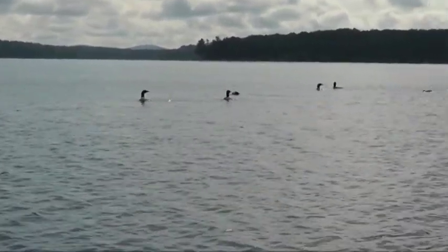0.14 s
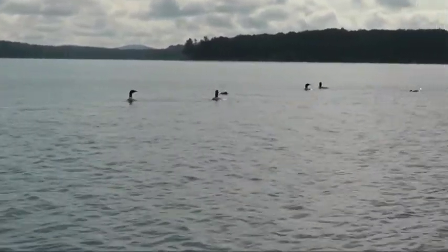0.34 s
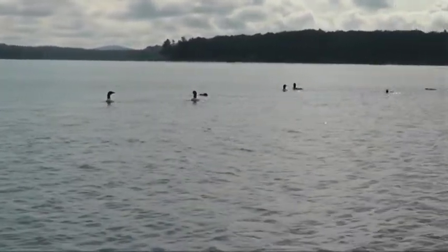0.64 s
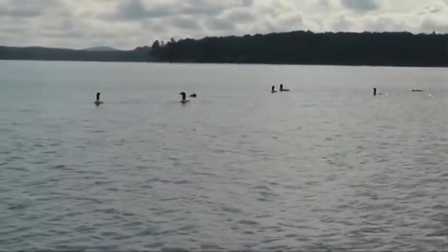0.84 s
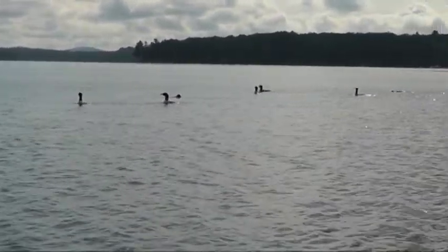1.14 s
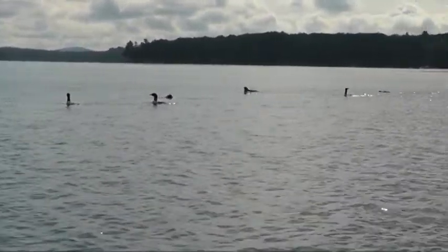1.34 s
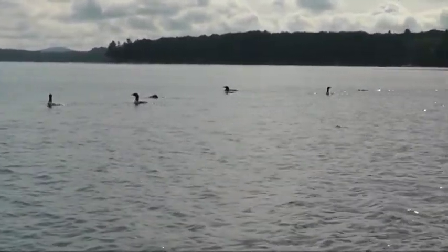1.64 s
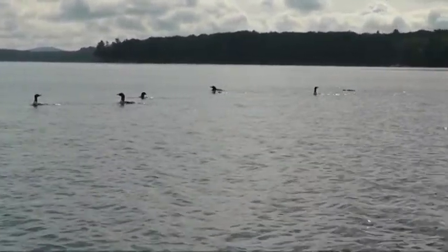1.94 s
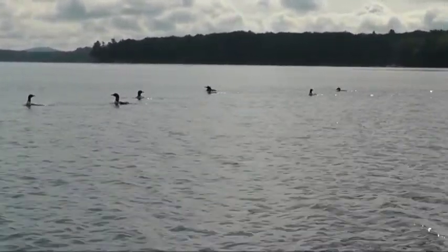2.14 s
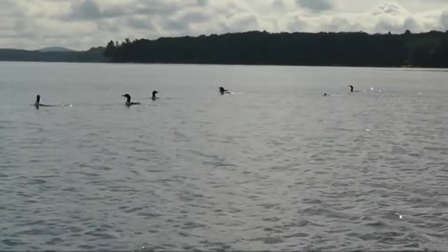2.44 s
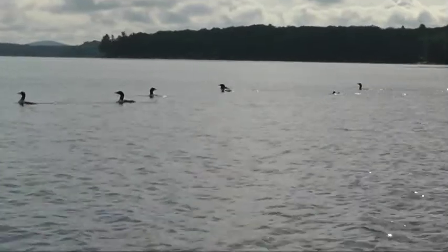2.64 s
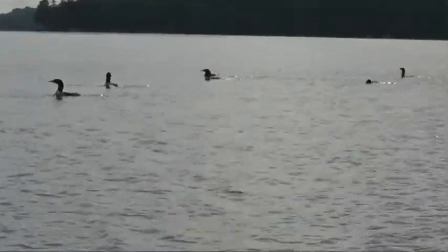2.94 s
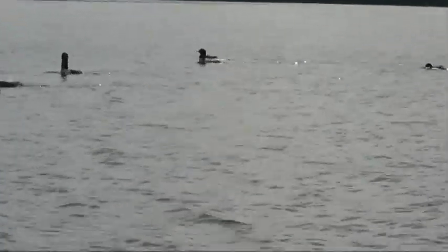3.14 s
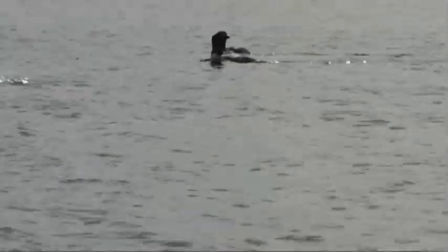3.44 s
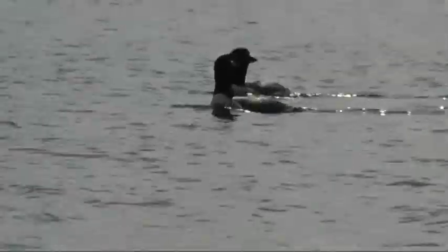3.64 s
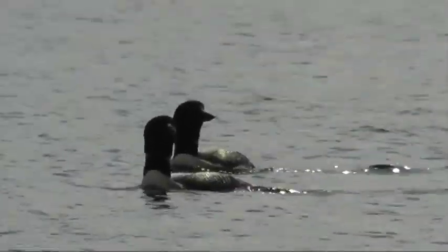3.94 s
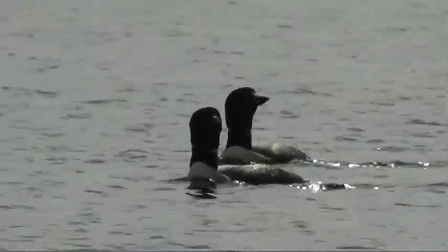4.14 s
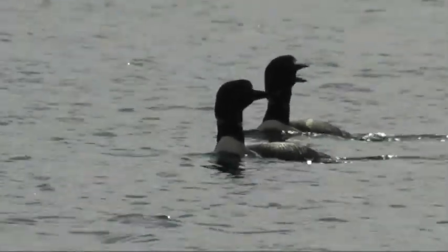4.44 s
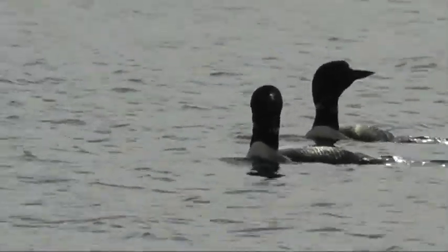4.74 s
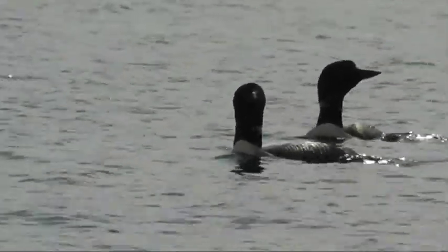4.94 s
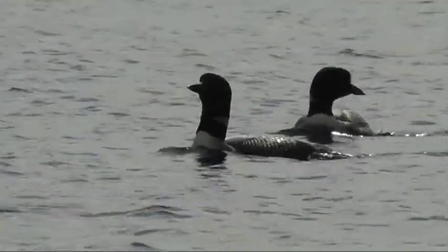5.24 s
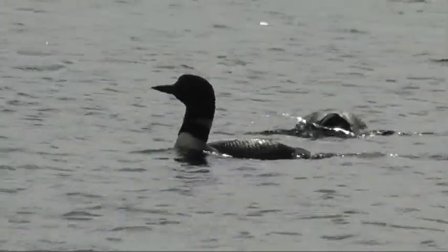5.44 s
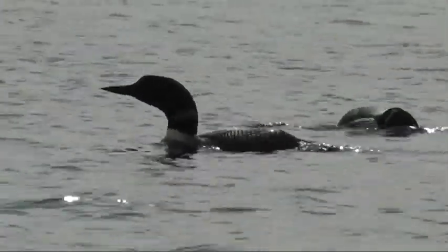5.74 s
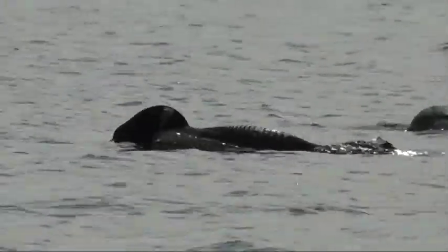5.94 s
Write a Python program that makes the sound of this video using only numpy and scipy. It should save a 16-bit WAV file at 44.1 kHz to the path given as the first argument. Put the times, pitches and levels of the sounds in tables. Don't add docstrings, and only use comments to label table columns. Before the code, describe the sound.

Several loons trade quavering, yodel-like laughing calls across an open lake, overlapping toward the end, over light wind buffeting and rippling water hiss.

```python
import sys
import numpy as np
from scipy import signal
from scipy.io import wavfile
from scipy.ndimage import uniform_filter1d

SR = 44100
rng = np.random.default_rng(int(sys.argv[2]) if len(sys.argv) > 2 else 0)


def persist_wave(psi):
    counts = np.round(np.clip(psi, -1, 1) * 32767).astype(np.int16)
    wavfile.write(sys.argv[1], SR, np.atleast_2d(counts).T)


N = 269010


def gain_of(db):
    return 10 ** (np.asarray(db) / 20)


def evened(x):
    return x / np.sqrt(np.mean(x ** 2) + 1e-20)


def read(points, hz):
    f, value = np.transpose(points)
    return np.interp(np.log(hz + 1), np.log(f + 1), value)


def place(sound, pan_db):
    ratio = gain_of(pan_db)
    return np.outer([2 * ratio / (1 + ratio), 2 / (1 + ratio)], sound)


def add(mix, s, sound):
    part = mix[:, round(s * SR):][:, :sound.shape[1]]
    part += sound[:, :part.shape[1]]


def arches(t, s, v, steep=0):
    slope = np.diff(v) / np.diff(s)
    a, b = slope[:-1], slope[1:]
    inner = np.where(a * b > 0, 2 * a * b / (a + b + 1e-9), 0)
    tangent = np.r_[slope[0], inner, slope[-1]]
    k = np.clip(np.searchsorted(s, t) - 1, 0, len(s) - 2)
    h = s[k + 1] - s[k]
    u = (t - s[k]) / h
    u = u - steep * np.sin(2 * np.pi * u) / (2 * np.pi)
    bend = u * (1 - u) * h * ((1 - u) * (tangent[k] - slope[k]) - u * (tangent[k + 1] - slope[k]))
    return v[k] + u * h * slope[k] + bend


# (start t/s, end t/s, dip f/Hz, dip level/dB)
NOTES = [
    [(.182, 0.21, 482, -67.5), (.222, 0.28, 620, -37.5), (.288, .616, 877.5, -37.5),
     (.645, 0.708, 889, -35)],
    [(1.073, 1.128, 667, -34.5), (1.132, 1.585, 898.7, -26)],
    [(2.943, 3.147, 685.6, -27.5), (3.141, 3.178, 780, -29.5), (3.182, 3.228, 709, -26.5),
     (3.225, 3.283, 900, -27.5), (3.287, 3.343, 681, -26.5), (3.344, 3.377, 750, -30.5),
     (3.38, 3.513, 638.5, -32)],
    [(3.341, 3.92, 708.3, -27)],
    [(3.925, 3.995, 617, -37.5), (4.04, 4.3, 875, -50.5), (4.322, 4.387, 839, -36.5),
     (4.41, 4.522, 592.7, -41)],
    [(4.24, 4.315, 602, -33), (4.331, 4.345, 963, -30.5), (4.344, 4.408, 721, -26), (4.41, 4.76, 888, -29)],
    [(4.745, 4.818, 666, -36), (4.822, 5.268, 865, -28.5)],
]
# (t/s, f/Hz, level/dB)
CRESTS_EARLY = [
    [(.195, 595, -41)],
    [(.285, 786, -30)],
    [(.27, 1093, -33), (.364, 1166, -27.5), (.463, 1178, -26), (.56, 1178, -26)],
    [(.66, 1130, -25.5)],
    [(1.097, 751, -23)],
    [(1.193, 1149, -17), (1.296, 1160, -15.5), (1.4, 1147, -16), (1.509, 1129, -16.5)],
    [(2.94, 747, -24.5), (3.041, 822.4, -21.5), (3.13, 923, -23)],
    [(3.147, 1146, -18.5)],
    [(3.223, 935, -24.5)],
    [(3.23, 1161, -16)],
    [(3.334, 893, -24.5)],
    [(3.349, 1102, -20.5)],
    [(3.365, 674, -20.5), (3.457, 718, -25.5)],
]
# (t/s, f/Hz, level/dB)
CRESTS_LATE = [
    [(3.355, 773, -25), (3.44, 836, -24), (3.523, 842.5, -23.5), (3.608, 846.2, -23.5), (3.693, 838, -24),
     (3.781, 825, -24.5), (3.88, 774, -26)],
    [(3.947, 708, -32.5)],
    [(4.048, 1114, -26), (4.143, 1139, -26), (4.243, 1132, -25)],
    [(4.353, 1119, -26.5)],
    [(4.457, 681.5, -29.5)],
    [(4.285, 779, -24)],
    [(4.34, 1054, -19)],
    [(4.362, 828, -23.5)],
    [(4.455, 1211, -15), (4.541, 1213, -16.5), (4.628, 1193, -16.5), (4.72, 1124, -20)],
    [(4.787, 773.5, -24)],
    [(4.885, 1155, -18), (4.988, 1154, -16.5), (5.092, 1140, -18), (5.201, 1063, -21.5)],
]
# (beat t/s, place of the dip in the beat 0-1, how far dips follow weaker crests 0-1)
QUAVER = [(0.11, 0.39, 0.1), (0.094, 0.5, 0.6), (0.08, 0.55, .2), (.085, .49, .95), (0.091, 0.55, 0.4),
          (.087, .53, 0.94), (.104, 0.5, 0.12)]
# (start t/s, end t/s, from f/Hz, to f/Hz, level/dB)
SCOOPS = [
    [(.155, .18, 473, 561, -53.5), (.613, .624, 660, 650, -30), (.628, 0.651, 624, 862, -33)],
    [(1.058, 1.076, 423, 647, -44)],
    [(2.91, 2.946, 421, 720, -42)],
    [],
    [(4.003, 4.037, 629, 801, -30), (4.31, 4.332, 649.5, 820, -34)],
    [(4.173, 4.213, 373, 533, -49.5), (4.219, 4.229, 612, 689, -29.5)],
    [],
]
# (start t/s, end t/s, f/Hz, from level/dB, to level/dB)
SIGHS = [
    [(0.706, 0.781, 600, -38.5, -47)],
    [(1.584, 1.64, 623, -29.5, -41)],
    [],
    [],
    [],
    [(4.747, 4.837, 639, -35.5, -42)],
    [(5.264, 5.295, 608, -35.5, -45)],
]
LOW = [(11.5, -5, 2.5, -19.5, -23, -34, -58, -69, -47, -41.5, -60, -56, -62, -54),
       (10.5, 2.5, -3, -61, -75, -21, -80, -35, -10.5, -37.5, -37, -32.5, -61, -54),
       (7, 3, -3, -5.5, -16, -25, -34, -38, -22, -20, -30.5, -32, -43, -64),
       (-35, -33.5, -12, -12, -22.5, -39.5, -20, -40.5, -22, -37, -29, -33.5, -50, -55.5),
       (-5.5, -13.5, 6.5, -36.5, -21.5, -26, -56.5, -40, -36, -42, -44, -43.5, -62, -60),
       (-23, 8, -7.5, -5.5, -52, -28, -40.5, -56.5, -14, -35, -33.5, -35, -49.5, -55.5),
       (-6.5, 0, -1.5, -4.5, -58, -40.5, -38, -35, -38.5, -26.5, -40, -27.5, -58.5, -61.5)]
HIGH = [(-40.5, -22.5, -31.0, -39.5, -48, -33, -27, -58, -39.5, -47, -45, -52.5, -73, -55),
        (-33, -29, -27, -17, -12.5, -24, -20, -26, -23.5, -39.5, -22.5, -39, -46, -58.5),
        (-47.5, -13.5, -21.5, -51, -58, -31.5, -56, -56, -24.5, -43, -45.5, -36.5, -48, -79),
        (-38, -24.5, -21, -45.5, -38, -22.5, -56, -37, -42.5, -46, -46, -47.5, -76, -60.5),
        (-66.5, -26.5, -33, -57.5, -44.5, -33.5, -49, -35, -56, -31, -47, -53, -64.5, -75),
        (-45, -28.5, -42.5, -27, -32.5, -31.5, -27, -30.5, -28, -42.5, -33.5, -40, -56, -62.5)]
SWELL = [2.4, 1.3, 1.1, 1.1, 3.2, 1.1, 1.9]
STEEP = [0.075, 0.17, 0.054, 0.16, 0.086, 0.21, .3]
# (f/Hz, level/dB)
DENTS = [
    [(2000, -1.5), (3200, 0)],
    [(2750, 2), (3120, -13), (3480, -4.5), (5200, -2), (6400, -10)],
    [(2750, 10), (4700, -11.5), (6000, 1)],
    [(2250, -7.5), (4100, -1.5), (5400, -5.5)],
    [(3100, -2.5), (4500, -2)],
    [(3050, -5), (4600, -8), (5600, -2)],
    [(3170, -3.5), (5400, 4.5), (6800, -12.5)],
]
# (overtones falling level/dB, overtones climbing level/dB, whole voice falling level/dB)
GLIDE = [(-.24, 0.2076, -0.08), (-0.32, 0.1748, -0.01), (0.05, 0.27, 0.15), (-.1, 0.1358, -0.01),
         (-1.7, .24, -0.1), (-0.32, -0.07, 0.09), (-0.08, 0.0725, -0.04)]
# (left-right level/dB, overtone dimming in dB per dB of lost effort,
# third-tones level/dB, rasp level/dB)
BIRDS = [(7, 1.36, -69, -37.5), (2.5, 1.14, -47, -38), (-1, 1, -52, -45), (-1, 1.35, -55, -35.5),
         (8, -0.15, -68.5, -30.5), (0.5, 1.33, -27, -40), (3, 1, -54, -39.5)]
CRACK_DB = [-30, -37, -1, -20, -20, -14, -24]
# (brightness level/dB per octave, odd overtones level/dB, roughness 0-1)
BEAK = [(1, -1, 0.4), (2.3, -3, 0.12), (3.5, 0.5, .1), (1.5, 2, 0), (0.3, -0.5, 0), (0, 1, 0.02), (1, 0, 0),
        (-0.6, 3, 0), (1, -4.5, .2), (0.3, -1, 0.1), (0.4, -1, 0.2), (-1, -1, 0.05), (2.5, -3.5, 0.3),
        (0.64, -2.7, 0.05), (1.3, 6, 0.7), (-2.5, 11, 0.6), (1, 5, 0.1), (2.5, 6.5, 0.04), (2.5, 5, 0),
        (-3.2, 1.5, 1), (-5.5, -7, 0.8), (1.6, 2, 0), (3, -6.5, .5), (1.7, -8, 0.4), (0.7, 0.5, 0),
        (-0.4, 4, 0), (-0.2, 4, 0.3), (1.5, 1, 0), (3, -2.5, 0), (0.3, -1, 0), (1, 0, 0.1),
        (-0.9, 2.5, 0.03), (0.6, -1.5, 0), (2.5, 1, 0.8), (1.5, 2, 0.2), (-0.2, -2, 0), (0.8, -2, .5),
        (0.7, 1, 0), (0.2, -0.5, 0.25), (3, -0.5, 0.5), (3.5, -3, 0.5), (5, 0.5, 0.3), (1, 4, 0.04),
        (1.5, -3, 0.3), (1.5, -6, .1), (2.5, -5, 0.8), (3.5, 3, 0)]
THIRD_DB = [2, 1, 0, 2, -0.5, 2, 0.6, -0.5, -1, -4, -8, 2.5, .3, 3, 1, 0.5, -2, -1, -2.5, 1, -3, -1, 2.5,
            -1.5, 3, 1, 1, -0.5, 1, 1.5, 0.7, .3, -1.5, -2.5, 1.5, -1, -4, -1, 0.6, 2, .3, -3, -0.5, -1,
            -1.5, -1.5, .3]


def loons():
    scoop_bend = 0.37
    sag_hz_per_s = 890
    out = np.zeros((2, N))
    crests = iter(CRESTS_EARLY + CRESTS_LATE)
    beaks = iter((*row, db) for row, db in zip(BEAK, THIRD_DB))
    plain = np.array([[0], [.1], [.1], [.25], [0]])
    highs = HIGH[:3] + [None] + HIGH[3:]
    birds = zip(NOTES, QUAVER, SCOOPS, SIGHS, LOW, highs, SWELL, STEEP, DENTS, GLIDE, BIRDS, CRACK_DB)
    for notes, beat, scoops, sighs, *throat, (pan_db, *voice), crack_db in birds:
        call = [quaver(*row, next(crests), beaks, *beat) for row in notes]
        low_rows = [rows for *_, rows, beak in call if max(row[1] for row in rows) < 1000]
        full_db = max(db for rows in low_rows for s, hz, db in rows)
        for a, b, hz, to_hz, db in scoops:
            middle = ((a + b) / 2, hz + scoop_bend * (to_hz - hz), db)
            call.append((a, b, [(a, hz, db), middle, (b, to_hz, db)], plain))
        for a, b, hz, db, to_db in sighs:
            call.append((a, b, [(a, hz, db), (b, hz - sag_hz_per_s * (b - a), to_db)], plain))
        for part in call:
            s, sound = note(*part, *throat, full_db, *voice, crack_db)
            add(out, s, place(sound, pan_db))
    high_pass = signal.butter(2, 3200, "high", fs=SR, output="sos")
    top = signal.sosfiltfilt(high_pass, out[0] - out[1])
    return out - np.outer([.36, -.36], top)


def quaver(start, end, dip_hz, dip_db, crests, beaks, beat, dip_at, follow):
    sag_hz_per_s, last_dip = 890, 0.97
    s, hz, db = np.transpose(crests)
    s_wide = np.r_[s[0] - beat, s, s[-1] + beat]

    def between(v):
        return (np.r_[v[0], v] + np.r_[v, v[-1]]) / 2

    dips = np.array([s_wide[:-1] + dip_at * np.diff(s_wide),
                     dip_hz * (between(hz) / hz.max()) ** follow,
                     dip_db + follow * (between(db) - db.max())])
    sag = (hz.max() < 1000) * np.array([0, 1, 0])
    dips[:, -1] *= 1 - sag * (1 - last_dip)
    hold = np.array([.05, 0, 0])
    holds = [dips[:, 0] - hold, dips[:, -1] + hold - sag * hold[0] * sag_hz_per_s]
    turning_points = sorted(map(tuple, np.r_[crests, dips.T, holds]))
    return start, end, turning_points, np.c_[s, [next(beaks) for _ in s]].T


LOW_HZ = [950, 1250, 1500, 1700, 2000, 2300, 2550, 3000, 3400, 3900, 5000, 6500, 9000, 14000]
HIGH_HZ = [1750, 2000, 2300, 2650, 3000, 3450, 3800, 4300, 4650, 5300, 5800, 7000, 9500, 15000]
ATTACK_DB = (-4, -1)
THIRDS = {2: 3., 4: -8., 5: -4., 7: -30., 8: -28., 10: -28., 11: -30.}.items()


def note(start, end, rows, beak, low, high, swell, steep, dents, glide_db, full_db, dim, third_db,
         rasp_db, crack_db):
    pitch_round = 6.1
    attack_s, release_s, release_db = 0.015, 0.014, -5.5
    s, pitch, level = np.transpose(rows)
    is_high = pitch.max() > 1000
    t = np.arange(start - .003, end + 0.014, 1 / SR)
    inside = np.clip(t, s[0], s[-1])

    hz = arches(inside, s, pitch ** pitch_round, np.clip(steep, -.9, .9)) ** (1 / pitch_round)
    db = 20 * np.log10(arches(inside, s, gain_of(level * swell)) + 1e-9) / swell
    db += ATTACK_DB[int(is_high)] * np.clip(1 - (t - start) / attack_s, 0, 1)
    db += release_db * np.clip(1 - (end - t) / release_s, 0, 2) ** 2

    air = rng.standard_normal((3, len(t)))
    wobble = rng.random((40, 2))
    turns = np.cumsum(hz * (1 + 0.015 * uniform_filter1d(air[2], size=150))) / SR

    lost_db = db - level.max() if is_high else 1.15 * np.clip(db - full_db, -9, 0)
    glide = np.clip(np.gradient(np.log2(hz)) * SR, -9, 9)
    lost_db = lost_db + np.where(glide < 0, glide_db[0], glide_db[1]) * glide
    db = db + glide_db[2] * np.minimum(glide, 0)

    grid = np.geomspace(800, 16000, 300)
    pipe_db = read(list(zip(HIGH_HZ, high) if is_high else zip(LOW_HZ, low)), grid)
    for f, d in dents:
        pipe_db = pipe_db + d * np.exp(-(np.log(grid / f) / .04) ** 2 / 2)
    pipe = np.c_[grid, pipe_db]

    bright_db, odd_db, rough, three_db = (np.interp(t, beak[0], v) for v in beak[1:])
    rough = rough * ((hz - hz.min()) / (hz.max() - hz.min() + 1)) ** 6.1
    rasp = evened(signal.lfilter(*signal.butter(3, 500, fs=SR), air))

    if is_high:
        crack_fall = (t - t[0]) / .05
    else:
        to_flip = t[-1] - t + (hz[-1] < 800)
        crack_fall = np.maximum(to_flip - .032, 0) / .02
    crack = gain_of(crack_db - 60 * crack_fall)
    uneven = .033 * rough * rasp[0] + .04 * np.minimum(crack, 1) * rasp[1]
    shimmer = 1 + (0.0047 + 0.15 * rough + (.7 if is_high else .8) * crack) * rasp[1]

    out = np.cos(2 * np.pi * turns) * (1 + (gain_of(rasp_db) + 0.059 * crack) * rasp[0])
    for k in range(2, int(15500 / hz.max()) + 1):
        over_db = read(pipe, k * hz) + np.log2(k) * (dim * lost_db + bright_db)
        over_db += k % 2 * odd_db + (k == 3) * three_db
        over_db += (k == 2) * -7 * crack
        throat = np.sin(2 * np.pi * ((4 + 21 * wobble[k, 0]) * t + wobble[k, 1]))
        over_db += min(k, 5) * .8 * throat
        phase = 2 * np.pi * k * (turns + uneven * min(k / 5, 1)) + k
        out += gain_of(over_db) * np.cos(phase) * shimmer

    haze = evened(signal.lfilter(*signal.butter(2, [1800, 7000], "band", fs=SR), air[1]))
    out += gain_of(-42 + 0.73 * lost_db) * (.3 + rough) * haze

    if is_high:
        for k, step_db in THIRDS:
            leak_db = third_db + step_db + .5 * (db - level.max())
            out += gain_of(leak_db) * np.cos(2 * np.pi * k * turns / 3)
    else:
        out *= 1 + .4 * np.minimum(crack, .9) * np.cos(np.pi * turns)
    edge = np.clip(np.minimum(t - t[0], t[-1] - t) / .009, 0, 1)
    return t[0], np.sqrt(2) * gain_of(db) * out * np.sin(np.pi / 2 * edge) ** 2


def lake(x):
    t = np.arange(2 * SR) / SR
    taps = rng.standard_normal((2, len(t)))
    ripples = gain_of(-9.5) * evened(gain_of(-60 * t / 0.092))
    shores = gain_of(-36.0) * evened(gain_of(-60 * t / 2.0) * np.minimum(t / 0.055, 1))
    near = signal.lfilter(*signal.butter(1, 2600, fs=SR), taps * ripples)
    far = signal.lfilter(*signal.butter(2, 1600, fs=SR), taps * shores)
    echo = (near + far) / np.sqrt(len(t))
    return signal.fftconvolve(x.mean(0)[None], echo, axes=1)[:, :N]


def noise(points, size, patch_db, flicker_db, channels, count=8):
    frames, hz = 4 * N // size + 5, np.fft.rfftfreq(size, 1 / SR)
    a, b, patches = rng.standard_normal((frames, len(hz), channels, 3)).T
    patches = uniform_filter1d(patches, size=count, axis=1)
    patches = evened(uniform_filter1d(patches, size=8, axis=2))
    flicker = evened(uniform_filter1d(rng.standard_normal((frames, channels)), size=5, axis=0)).T[:, None]
    level_db = read(points, hz)[:, None] + patch_db * patches + flicker_db * flicker
    return hz, (a + 1j * b) * gain_of(level_db)


def sound_of(z, size):
    return evened(signal.istft(z, nperseg=size, noverlap=3 * size // 4)[1][..., :N])


# (f/Hz, level/dB per Hz)
WIND = [(12, -57.5), (20, -52), (80, -0.5), (125, 2), (166, -2.5), (315, -15), (461, -27), (585, -45.5),
        (634, -56.5), (900, -49), (1170, -71), (1980, -120)]
# (f/Hz, level/dB per Hz)
WIND_SIDE = [(18, -53), (30, -20.5), (75, -11), (124, -8), (238, -15), (274, -21), (319, -25.5), (400, -27),
             (520, -40.5), (880, -120)]


def wind():
    gust_db = gusts()
    steady_db = 0.63 * gust_db + 0.23 * uniform_filter1d(gust_db, size=30000)
    _, mid = noise(WIND, size=1024, patch_db=1.5, flicker_db=2.0, channels=1, count=2)
    _, side = noise(WIND_SIDE, size=1024, patch_db=4.5, flicker_db=3.0, channels=1, count=2)
    mid = gain_of(gust_db) * sound_of(mid, size=1024)[0]
    side = gain_of(steady_db + 6.0) * sound_of(side, size=1024)[0]
    return signal.lfilter(*signal.butter(2, 45, "high", fs=SR), np.array([mid + side, mid - side]))


# (start t/s, end t/s, level/dB)
GUSTS = [(0.01, 0.32, -44), (0.577, 0.76, -47), (0.962, 1.2, -52), (1.09, 1.165, -42), (1.269, 1.28, -45.5),
         (1.39, 1.46, -44.5), (1.602, 1.78, -40.5), (1.933, 2.12, -43), (2.034, 2.08, -33),
         (2.29, 2.7, -40), (2.713, 2.89, -41.5), (2.97, 2.96, -42.5), (3.05, 3.3, -44.5),
         (3.364, 3.62, -47), (3.745, 3.87, -45.5), (4.02, 4.08, -48), (4.248, 4.365, -47.5),
         (4.504, 4.8, -51.5), (4.69, 3.8, -58), (4.838, 5, -51.5), (5.0, 5.15, -57.5), (5.187, 6.3, -58),
         (5.38, 5.2, -57.5), (5.517, 5.6, -55.5), (5.945, 5.96, -47)]


def gusts():
    rise_db_per_s, fall_db_per_s = 170.5, 154.5
    calm_db, calm_fade_db_per_s = -47.5, 3
    t = np.arange(N) / SR
    coarse = t[::64]
    start, end, db = np.transpose(GUSTS)[..., None]
    drop_db = np.maximum(rise_db_per_s * (start - coarse), fall_db_per_s * (coarse - end))
    power = (gain_of(db - np.maximum(drop_db, 0)) ** 2).sum(0)
    power += gain_of(calm_db - calm_fade_db_per_s * coarse) ** 2
    return np.interp(t, coarse, 10 * np.log10(power))


# (t/s, peak level/dB, ring f/Hz, 60 dB decay t/s, left-right level/dB)
TICKS = [
    (2.343, -52, 1300, .012, -6),
    (2.598, -50, 4900, .03, -6),
    (2.605, -47, 6500, .025, -6),
    (2.6142, -28, 4800, .009, 0),
    (2.6143, -34, 7400, .009, 0),
    (2.6145, -36, 1000, .02, 0),
    (4.5925, -41, 2160, .012, -6),
    (6.0155, -43, 5200, .014, -5),
]


def ticks():
    out, t = np.zeros((2, N)), np.arange(1200) / SR
    for s, db, hz, t60, pan_db in TICKS:
        grit = rng.standard_normal(len(t)) * gain_of(-60 * t / max(t60, .002))
        ring = signal.lfilter(*signal.iirpeak(min(hz, 12000), 4.5, fs=SR), grit) + 0.11 * grit
        ring = signal.lfilter(*signal.butter(3, 8500, fs=SR), ring)
        add(out, s, place(gain_of(db) * ring / abs(ring).max(), pan_db))
    return out


# (crest t/s, length t/s, top f/Hz, drop f/Hz, level/dB)
PEEPS = [
    (.92, .3, 1150, 40, -61),
    (2.492, .11, 4450, 1300, -71),
    (2.72, .055, 3550, 450, -68),
]


def peeps():
    out = np.zeros((2, N))
    for s, length, top_hz, drop_hz, db in PEEPS:
        u = np.linspace(-1, 1, round(length * SR))
        turns = np.cumsum(top_hz - drop_hz * u ** 2) / SR
        whistle = np.sin(2 * np.pi * turns) * np.sqrt(1 - u ** 2)
        whistle *= abs(evened(uniform_filter1d(rng.standard_normal(len(u)), size=300)))
        add(out, s - length / 2, place(gain_of(db) * whistle, 0))
    return out


# (f/Hz, level/dB per Hz)
HISS = [(240, -9.5), (400, -9.5), (528, -9.5), (839, -6), (1010, -13.5), (1160, -4.5), (1250, -17.5),
        (1650, -18.5), (1790, -22.5), (2750, -19.5), (3070, -25), (4650, -26.5), (6950, -25), (15000, -28),
        (16000, -24.5)]
# (f/Hz, likeness 0-1)
SAME = [(60, 0.5), (180, 0.24), (550, 0.3), (1650, 0.45), (4970, 0.96), (15000, 0.3)]
# (t/s, level/dB)
LAPPING = [(0, -0.5), (1.699, -0.5), (2.601, -1), (3, 0), (5.502, 2.5), (5.68, 6), (5.799, 4), (6.1, 2.5)]


def water():
    hz, z = noise(HISS, size=512, patch_db=1.0, flicker_db=1.3, channels=2)
    same = np.clip(read(SAME, hz), 0, 1)[:, None]
    lap_db = np.interp(np.arange(z.shape[2]) * 128 / SR, *np.transpose(LAPPING))
    z = z * gain_of(np.outer(hz < 3000, lap_db))
    z = np.array([z[0], same * z[0] + np.sqrt(1 - same ** 2) * z[1]])
    return gain_of(-57) * sound_of(z, size=512)


def scene():
    birds = loons()
    return birds + lake(birds) + wind() + ticks() + peeps() + water()


def top_cut(x):
    return signal.sosfilt(signal.butter(12, 15800, fs=SR, output="sos"), x)


def record(dry):
    mid, side = (dry[0] + dry[1]) / 2, (dry[0] - dry[1]) / 2
    voice = signal.sosfilt(signal.butter(4, 500, "high", fs=SR, output="sos"), mid)
    voice_db = 10 * np.log10(abs(uniform_filter1d(voice ** 2, size=900)) + 1e-12)
    fall = np.arange(N) * 320.0 / SR
    held_db = np.maximum.accumulate(voice_db + fall) - fall
    cut_db = np.interp(held_db, [-50, -30], [-18, 0])
    low = signal.sosfiltfilt(signal.butter(2, 550, fs=SR, output="sos"), side)
    side = side + (gain_of(cut_db) - 1) * low
    return top_cut(np.array([mid + side, mid - side]))


dry = scene()
out = record(dry)
persist_wave(out)
```